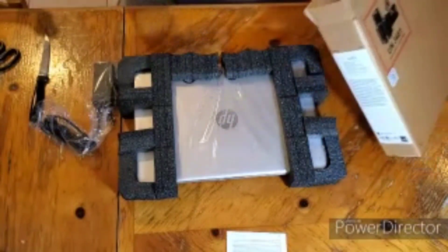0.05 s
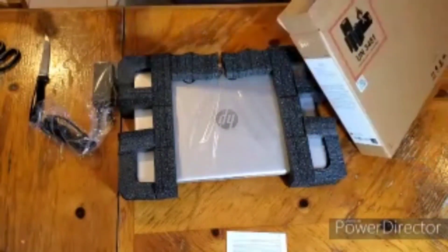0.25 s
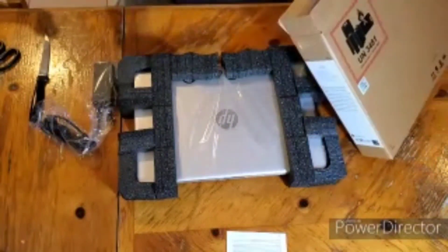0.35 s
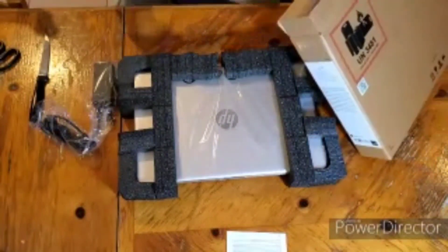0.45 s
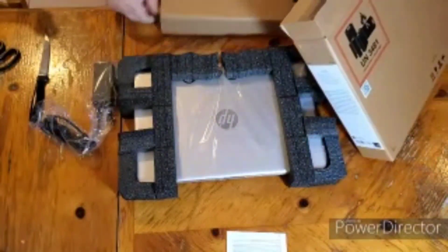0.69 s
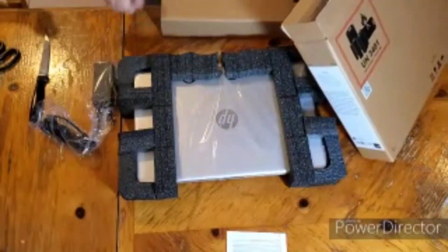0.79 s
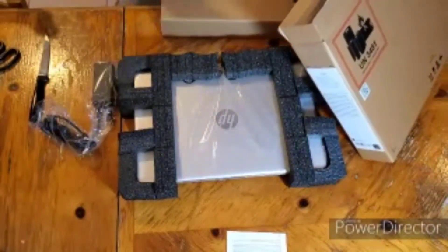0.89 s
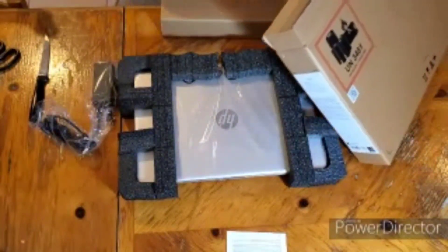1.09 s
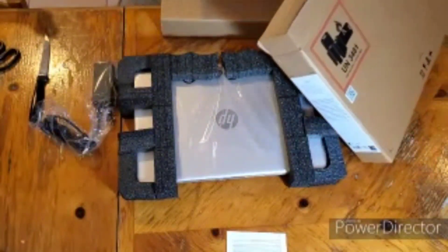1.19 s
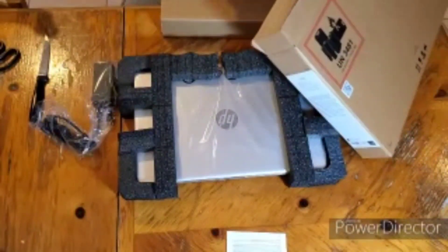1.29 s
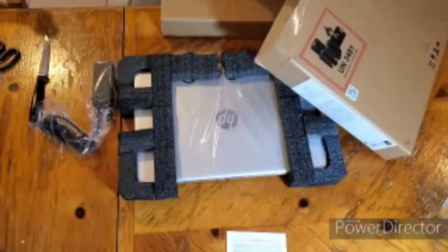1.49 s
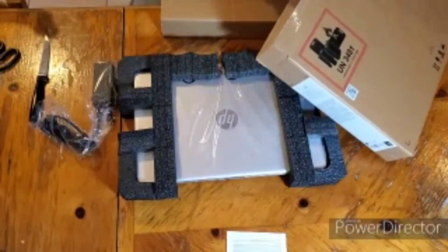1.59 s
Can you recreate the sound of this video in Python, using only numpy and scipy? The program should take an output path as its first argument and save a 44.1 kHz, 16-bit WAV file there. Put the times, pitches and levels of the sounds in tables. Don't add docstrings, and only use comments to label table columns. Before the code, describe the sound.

A cardboard box on a wooden table, heard close in a small room. A faint slide leads to a hard double slam at 0.2 s with tiny bounces and rocking until 0.35. Faint taps come near 0.5, then a hollow, ringing knock at 0.74, damped by 0.9. After near quiet, a hissing scrape runs 1.25-1.55, its edge thudding down at 1.5, then soft bumps and a tiny squeak. Faint low hum.

```python
import sys
import numpy as np
from scipy import signal
from scipy.fft import rfft, irfft
from scipy.io import wavfile
from scipy.ndimage import uniform_filter1d

SR = 44100
rng = np.random.default_rng(int(sys.argv[2]) if len(sys.argv) > 2 else 0)


def makeup_ratio(level_db):
    decades = np.asarray(level_db, float) / 20
    return 10 ** decades


def output_pcm(signal):
    pcm = np.clip(np.atleast_2d(signal).T, -1, 1) * 32767
    wavfile.write(sys.argv[1], SR, np.round(pcm).astype(np.int16))


N = 72765
T = np.arange(N) / SR

TAP_WET_DB = 9


def unit(x):
    return x / np.sqrt(np.mean(x ** 2))


def table_at(points, hz):
    p = np.array(points, float)
    return np.interp(np.log(np.maximum(hz, 1)), np.log(p[:, 0]), p[:, 1])


def curve(rows, column):
    r = np.array(rows, float)
    return np.interp(T, r[:, 0], r[:, column])


def conv(x, h):
    return signal.fftconvolve(x, h)[:N]


def colour(points, size=4096):
    log_gain = table_at(points, np.arange(size // 2 + 1) * SR / size) * np.log(10) / 20
    fold = np.r_[1, 2 * np.ones(size // 2 - 1), 1, np.zeros(size // 2 - 1)]
    h = irfft(np.exp(rfft(irfft(log_gain) * fold)))
    return h / np.sqrt(np.sum(h ** 2))


def ring(modes):
    t, total = T[:SR // 2], 0
    for k, (hz, db, t60) in enumerate(modes):
        decay = np.exp(-np.log(1000) * t / max(t60, .005))
        total = total + (-1) ** k * makeup_ratio(db) * np.sin(2 * np.pi * hz * t) * decay
    return total


def walls(peaks):
    return [(hz, db, np.log(1000) / np.pi / width) for hz, width, db in peaks]


def walk(rate):
    k = int(SR / rate)
    return unit(uniform_filter1d(uniform_filter1d(rng.standard_normal(N), k), k))


def room():
    # pitch_hz, t60_s
    room_t60 = [(100, 0.37), (220, 0.4), (500, 0.31), (1000, 0.35), (4000, 0.32), (10000, 0.27)]
    gap_s, build_s = 0.0018, 0.0024
    t, h = T[:int(.7 * SR)], 0
    edges = 40 * 2 ** np.arange(0, 9.1, .5)
    spec, hz = rfft(rng.standard_normal(len(t))), np.arange(len(t) // 2 + 1) * SR / len(t)
    for lo, hi in zip(edges[:-1], edges[1:]):
        band = irfft(spec * ((hz >= lo) & (hz < hi)), len(t))
        h = h + band * np.exp(-np.log(1000) * t / table_at(room_t60, np.sqrt(lo * hi)))
    h = h * np.clip((t - gap_s) / build_s, 0, 1)
    return h / np.sqrt(np.sum(h ** 2))


def crunch(ms, chance):
    r = np.exp(-1000 / (ms * SR))
    a = -2 * r * np.cos(np.pi * (.02 + .3 * chance))
    one = np.ones_like(a)
    sections = np.c_[r * r * one, a, one, one, a, r * r * one]
    return signal.sosfilt(sections, -signal.unit_impulse(2048))


def knock(blows, points, wet_db, modes=(), ring_db=0, damping_db=0):
    force, chance = np.zeros(N + 2048), rng.random(5)
    for s, db, ms in blows:
        start = int(s * SR)
        force[start:start + 2048] += makeup_ratio(db) * crunch(max(ms, .1), chance)
    close = conv(force, colour(points))
    wet = makeup_ratio(wet_db) * conv(close, room())
    if len(modes):
        r = ring(modes)
        close = close + makeup_ratio(ring_db + damping_db) * conv(force, r / np.abs(r).max())
    return close + wet


def slips():
    slips_per_s, spread_db = 7000, 2.5
    c = rng.random((3, N))
    happens = c[0] < slips_per_s / SR
    return unit(happens * np.sign(c[1] - .5) * makeup_ratio(-spread_db * np.log(c[2] + 1e-4)))


def grit(level_db, h):
    return unit(conv(slips(), h)) * makeup_ratio(level_db + 1.8 * walk(90))


def rub(level_db, h):
    wet_db = -5
    x = grit(level_db, h)
    return (x + makeup_ratio(wet_db) * conv(x, room())) / np.sqrt(1 + makeup_ratio(2 * wet_db))


def floor():
    # pitch_hz, level_db
    air_colour = [(60, -7.5), (240, -8.5), (450, -16), (1100, -18), (2000, -27), (5000, -29.5), (8000, -34),
                  (15500, -35)]
    # pitch_hz, rms_level_db
    hum_partials = [(60, -78.5), (119.5, -76)]
    air = unit(conv(rng.standard_normal(N), colour(air_colour))) * makeup_ratio(-78)
    return air + sum(np.sqrt(2) * makeup_ratio(db) * np.sin(2 * np.pi * hz * T) for hz, db in hum_partials)


def shake():
    # time_s, level_db
    shake_level = [(0, -56.5), (.1, -62), (.13, -91), (.205, -76), (.23, -49.5), (.3, -44.5), (.44, -82.5),
                   (.5, -68), (.6, -69), (.72, -82), (.78, -64), (1., -82.5), (1.18, -86.5), (1.22, -61),
                   (1.32, -61.5), (1.45, -72), (1.52, -55.5), (1.65, -55.5)]
    # pitch_hz, level_db
    shake_colour = [(25, -9.5), (65, 1.5), (125, 1), (200, -12), (500, -61.5)]
    rumble = unit(conv(rng.standard_normal(N), colour(shake_colour, size=16384)))
    return rumble * makeup_ratio(curve(shake_level, 1))


def drag():
    # time_s, level_db, brightness_db
    drag_path = [
        (0, -59.5, -21.5),
        (.1, -63.5, -14.5),
        (.115, -55, -22),
        (.17, -50, -20.5),
        (.195, -46, -29),
        (.209, -56, -43.5),
    ]
    # pitch_hz, level_db
    drag_colour = [(60, -17.5), (250, -0.5), (450, 7), (850, 0.5), (1600, -16), (3000, -50.5)]
    # pitch_hz, level_db
    drag_hiss = [(1200, -32), (1800, -3.5), (2300, -5.5), (2850, 0), (3800, -7), (5200, -1.5), (6300, -5),
                 (8000, -30)]
    db = np.where(T < drag_path[-1][0], curve(drag_path, 1), -120)
    return rub(db, colour(drag_colour)) + rub(db + curve(drag_path, 2), colour(drag_hiss))


def chirrs():
    # centre_s, length_s, pitch_hz, width_hz, level_db
    chirr_events = [(0.138, .015, 1820, 220, -67), (0.186, .016, 2800, 120, -68.5),
                    (0.188, .015, 5060, 500, -88), (0.197, 0.0096, 1680, 130, -55.5),
                    (0.491, .02, 246, 150, -60.5), (0.733, 0.016, 2950, 2970, -76.5),
                    (0.81, 0.021, 5140, 250, -68.5), (1.29, .012, 290, 84, -52.5),
                    (1.302, 0.023, 5650, 800, -52.5), (1.31, 0.031, 63, 20, -56),
                    (1.224, .02, 48, 31, -63.5), (1.6, .04, 109, 14, -63), (1.32, 0.018, 1450, 110, -61.5),
                    (1.33, 0.024, 2420, 130, -55.5), (1.347, 0.026, 394, 74, -51.5),
                    (1.352, 0.0084, 633, 110, -49.5), (1.436, .012, 4600, 1000, -53.5),
                    (1.451, 0.011, 1210, 230, -46.5), (1.468, 0.045, 890, 82, -53),
                    (1.47, 0.019, 3500, 500, -52.5), (1.621, 0.0095, 1930, 280, -63)]
    x = 0
    for s, length, hz, width, db in chirr_events:
        swell_db = db - 6 * ((T - s) / length) ** 2
        x = x + grit(swell_db, ring(walls([(hz, width, 0)])))
    return x + makeup_ratio(-8.5) * conv(x, room())


def landing():
    slam_db = (-0.5, 5)
    # start_s, level_db, crunch_ms
    bounces = [
        (0.2102, -12, 0.49),
        (0.2143, -15.5, 0.95),
        (.2190, -11, .5),
        (0.224, -5.5, .4),
        (.2280, -10.5, .4),
        (0.2372, -9, .2),
        (.246, -10, 0.3),
    ]
    # pitch_hz, level_db
    landing_colour = [(60, -25.5), (150, -8.5), (450, -0.5), (900, -3.5), (2000, -12), (5200, -19),
                      (7200, -33.5), (14000, -52)]
    # pitch_hz, level_db, t60_s
    landing_modes = [(150.7, -8.5, 0.37), (231, -1, 0.25), (411, -7.5, 0.22), (450, -4, 0.09),
                     (598.6, -6.5, 0.22), (884, -5, 0.096), (888, -4.5, 0.33), (1046, -7.5, 0.087),
                     (1211, -12.5, 0.12), (1577, -1, 0.076), (1832, -5.5, .06), (2124, -9, 0.27),
                     (3490, -3, .02), (5200, -3.5, .02)]
    # start_s, level_db, contact_ms
    rocking = [
        (.2520, -12.5, 0.9),
        (.270, -14, 0.92),
        (.287, -14.5, 1),
        (.311, -13.5, 1),
        (.336, -22, 0.53),
    ]
    # pitch_hz, level_db
    rocking_colour = [(100, -10.5), (400, 0), (1000, -5.5), (2100, -8), (3000, -29.5), (6000, -60.5)]
    slam_s, rebound_s, slam_ms, ring_db = .2168, .0048, 0.5, -25
    slam = [(slam_s + k * rebound_s, db, slam_ms) for k, db in enumerate(slam_db)]
    return (knock(slam + bounces, landing_colour, -4, landing_modes, ring_db)
            + knock(rocking, rocking_colour, -7.5, landing_modes, ring_db))


def taps():
    # start_s, level_db, contact_ms
    tap_blows = [
        (.5642, -35, 0.47),
        (0.38, -51.5, 0.7),
        (.587, -39, 0.41),
        (0.52, -41, 1),
    ]
    # pitch_hz, level_db
    tap_colour = [(70, -12.5), (300, -5), (660, -18.5), (950, -2), (1300, -10.5), (1800, -27),
                  (4300, -33.5), (5200, -23.5), (7000, -45)]
    # pitch_hz, width_hz, level_db
    tap_walls = [(175, 57, 9.5), (311, 77, 10), (1284, 65, -12), (2260, 84, -3), (4970, 82, -10)]
    return knock(tap_blows, tap_colour, TAP_WET_DB, walls(tap_walls), -8.5)


def bumps():
    # start_s, level_db, contact_ms
    bump_blows = [
        (.464, -39, 0.58),
        (.48, -33.5, 1.1),
        (1.196, -36.5, 2.6),
        (1.224, -37, 2.6),
        (1.273, -24.5, 1.8),
        (1.565, -26.5, 2.2),
        (1.63, -25, 1.4),
    ]
    # pitch_hz, level_db
    bump_colour = [(60, -17.5), (170, 9), (400, -1.5), (700, -10.5), (1500, -36.5), (3000, -45)]
    return knock(bump_blows, bump_colour, -5.5)


def hollow_knock():
    # start_s, level_db, contact_ms
    hollow_blow = [
        (.7440, -4.5, 0.94),
    ]
    # pitch_hz, level_db
    hollow_colour = [(200, -20), (390, -7), (480, -10), (620, 4), (770, -10.5), (1050, 2), (1500, -35),
                     (3000, -83.5)]
    # pitch_hz, level_db, t60_s
    hollow_modes = [(114, -14.5, 1), (382, 3, 0.48), (573, -1, 0.26), (613.7, -0.5, 0.17), (592, -8.5, .42),
                    (640, 5, 0.14), (870, -4, 0.4), (961, -1, 0.41), (1015, 0, 0.24), (1067, -10, 0.63),
                    (1143.6, -5.5, 0.55)]
    # pitch_hz, level_db
    tick_colour = [(1200, 4.5), (2300, -9), (3200, -14.5), (4400, -13.5), (5300, -9.5), (6200, -12),
                   (7500, -27), (11000, -41)]
    hand_s, hand_db = .915, -20
    damping_db = hand_db * np.clip((T - hand_s) * 50 + .5, 0, 1)
    return (knock(hollow_blow, hollow_colour, 2.5, hollow_modes, -20, damping_db)
            + makeup_ratio(-19) * knock(hollow_blow, tick_colour, TAP_WET_DB))


def scrape():
    # time_s, level_db, body_db
    scrape_path = [
        (1.15, -98, 10.5),
        (1.225, -68, -6),
        (1.268, -61.5, -22),
        (1.274, -53, -11),
        (1.33, -45, -2.5),
        (1.39, -55.5, -2),
        (1.445, -46.5, -8),
        (1.53, -55, 9.5),
        (1.6, -88, 10),
        (1.65, -69.5, 12),
    ]
    # pitch_hz, level_db
    scrape_colour = [(900, -34.5), (2300, -6.5), (3000, -4), (5800, -1.5), (7600, -15.5), (10500, -23),
                     (13000, -20), (15500, -22)]
    # pitch_hz, level_db
    scrape_body = [(100, -18), (380, -1.5), (650, -2), (1200, -3.5), (2000, -8.5), (4000, -37)]
    # pitch_hz, width_hz, level_db
    squeak_bands = [
        (2050, 200, -68),
        (5186, 300, -58.5),
    ]
    squeak_s, squeak_length_s = 1.632, 0.0065
    sizzle_s, sizzle_db, sizzle_fade_db_per_s = 1.3, -16, 41.5
    db = np.where(T > scrape_path[0][0], curve(scrape_path, 1), -120)
    sizzle_level = db + sizzle_db - sizzle_fade_db_per_s * np.abs(T - sizzle_s)
    sizzle = rub(sizzle_level, ring(walls([(14040, 900, 0)])))
    fade_db = -6 * ((T - squeak_s) / squeak_length_s) ** 2
    squeak = sum(rub(fade_db + peak_db, ring(walls([(hz, width, 0)])))
                 for hz, width, peak_db in squeak_bands)
    hiss = rub(db, colour(scrape_colour))
    body = rub(db + curve(scrape_path, 2), colour(scrape_body))
    return hiss + body + squeak + sizzle


def edge_down():
    # start_s, level_db, contact_ms
    edge_blows = [
        (1.4950, -11.5, 0.35),
        (1.4975, -20.5, 0.91),
        (1.5035, -16, 4.9),
        (1.513, -22, 2.2),
        (1.534, -29, 3),
        (1.550, -26, 2.4),
    ]
    # pitch_hz, level_db
    edge_colour = [(40, -14), (150, 2.5), (420, -4), (1450, -5.5), (1900, -12), (2600, -27), (4000, -64),
                   (8000, -89)]
    # pitch_hz, width_hz, level_db
    edge_walls = [(72, 5, -4), (235, 8.1, -15), (429, 9, -1), (876, 13, 2), (1158, 32, -1), (1477, 75, 3)]
    return knock(edge_blows, edge_colour, -10, walls(edge_walls), -22)


def scene():
    # centre_s, length_s, level_db
    hushes = [(.7374, .006, -22)]
    # pitch_hz, side_level_db
    side_level = [(300, -70), (700, -34), (1400, -22), (4000, -12), (8000, -20)]
    hits = landing() + taps() + bumps() + hollow_knock() + edge_down()
    hush = makeup_ratio(sum(db * np.exp(-((T - s) / (length / 2)) ** 4) for s, length, db in hushes))
    mid = hush * (floor() + shake() + drag() + chirrs() + hits + scrape())
    side_gain = makeup_ratio(table_at(side_level, np.arange(N // 2 + 1) * SR / N))
    side = irfft(1j * rfft(mid) * side_gain, N)
    side = side * np.exp(-((T - .25) / 0.051) ** 2)
    return np.array([mid + side, mid - side])


def top_cut(x):
    return signal.sosfilt(signal.butter(12, 15820, fs=SR, output="sos"), x)


def record(dry):
    low_pass = signal.ellip(8, .2, 70, 15450, fs=SR, output="sos")
    x = signal.sosfilt(low_pass, dry)
    return top_cut(x)


dry = scene()
out = record(dry)
output_pcm(out)
```